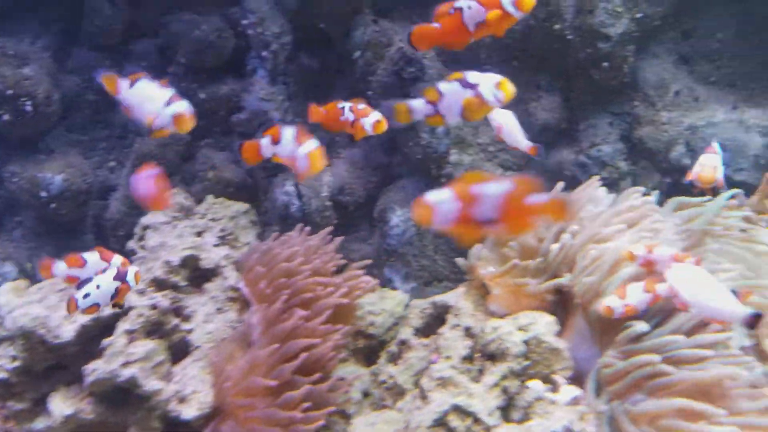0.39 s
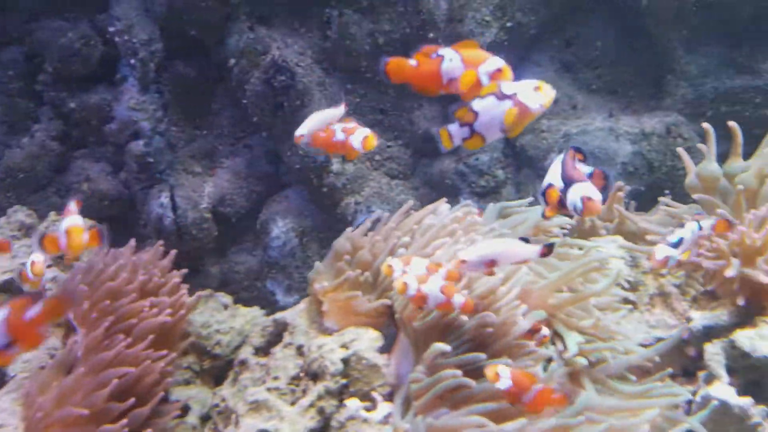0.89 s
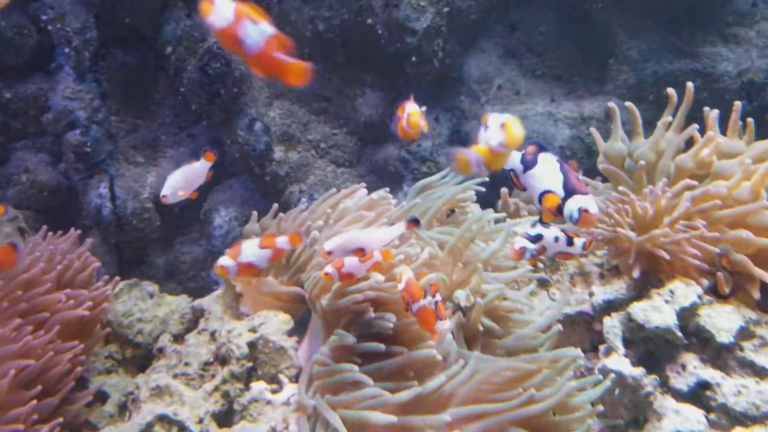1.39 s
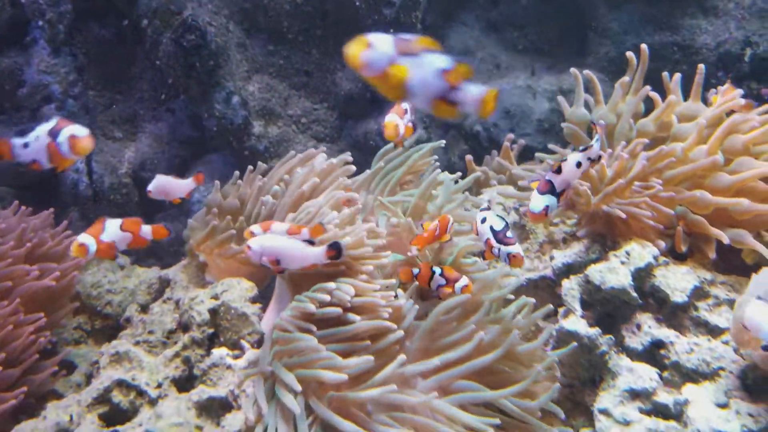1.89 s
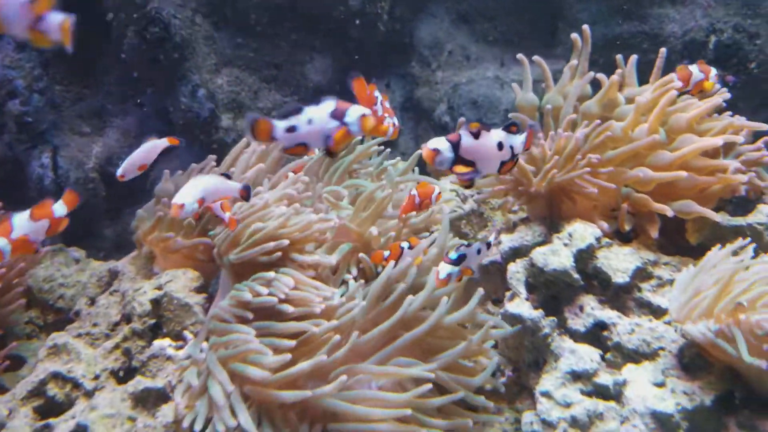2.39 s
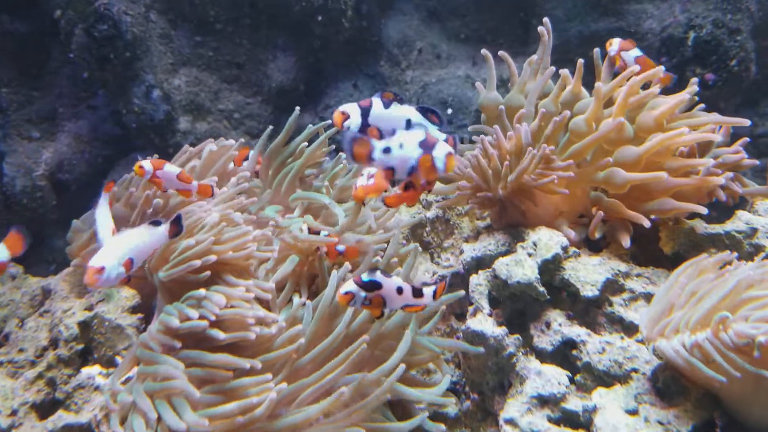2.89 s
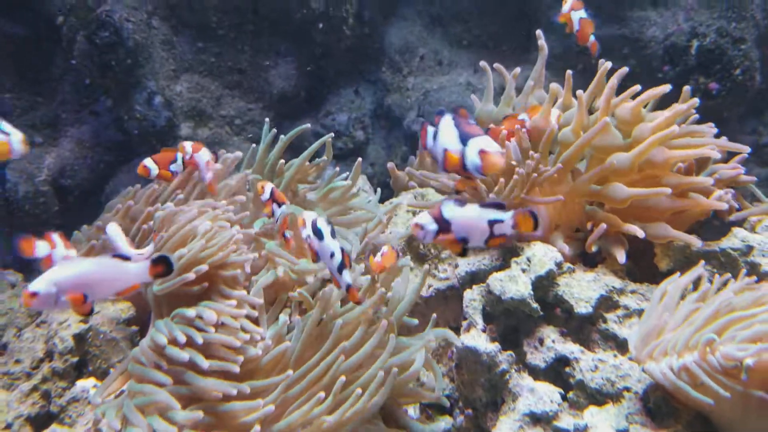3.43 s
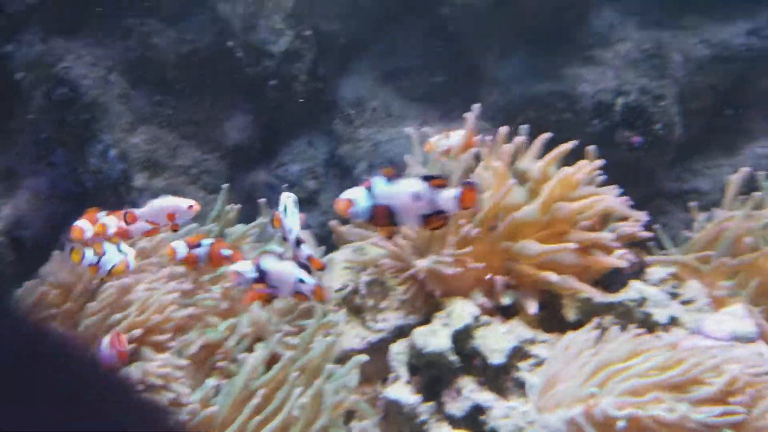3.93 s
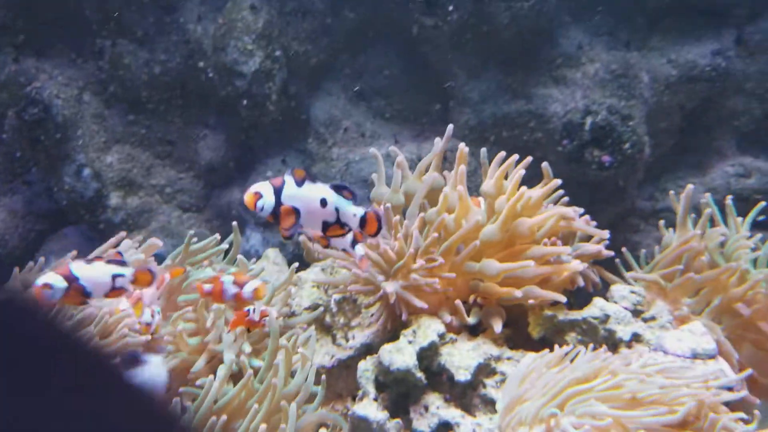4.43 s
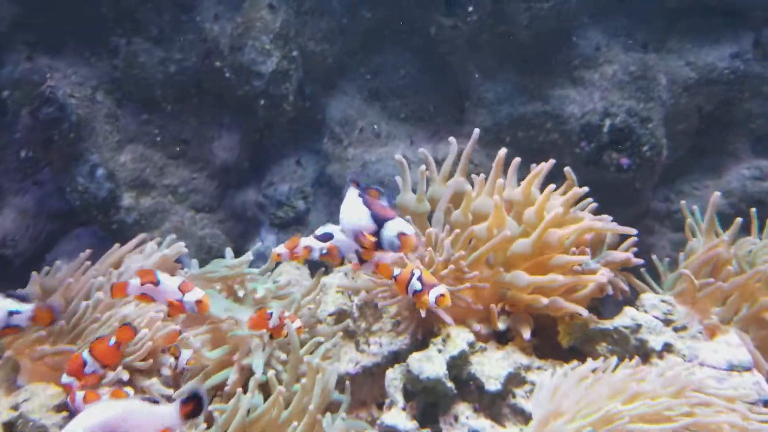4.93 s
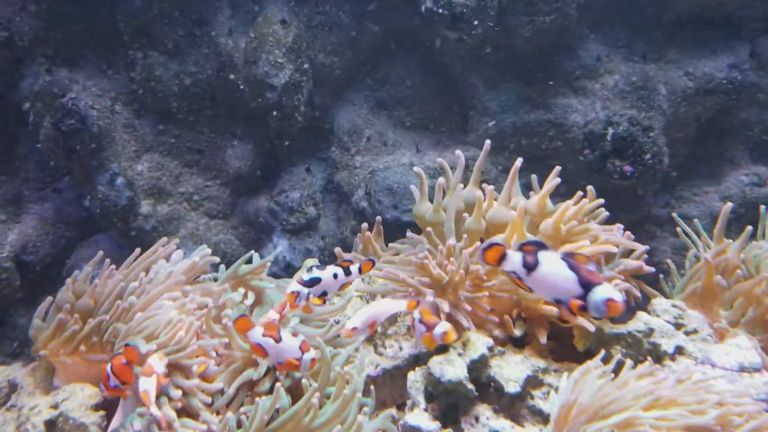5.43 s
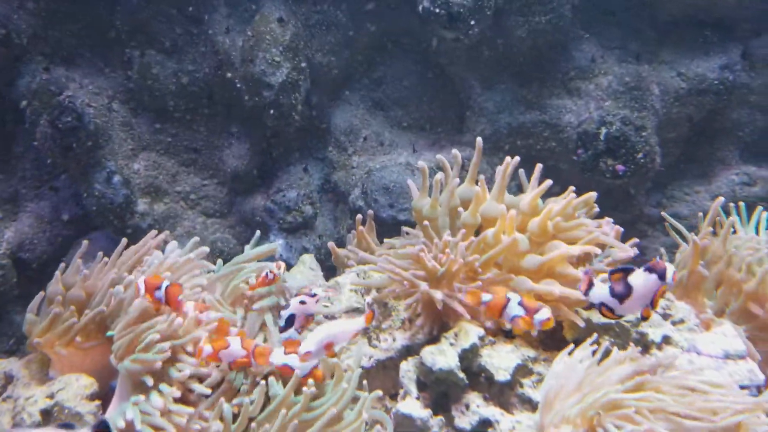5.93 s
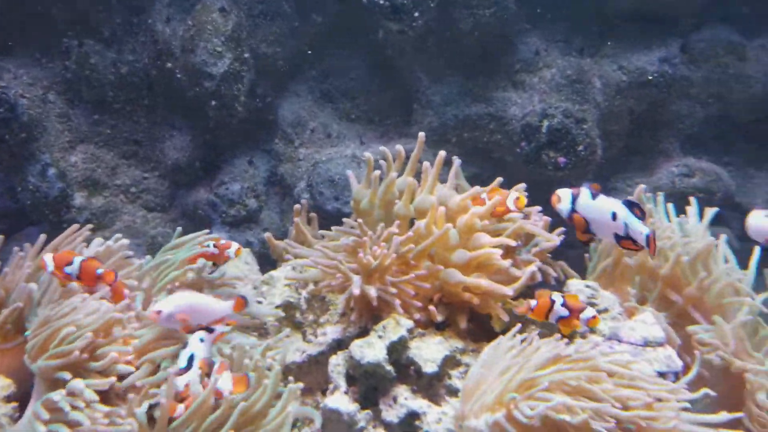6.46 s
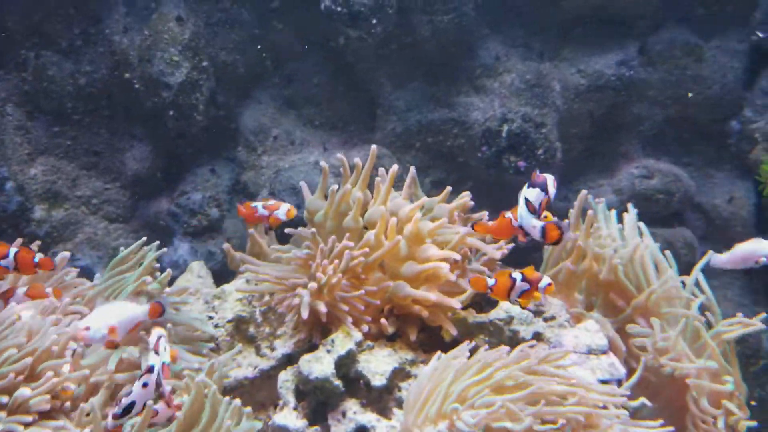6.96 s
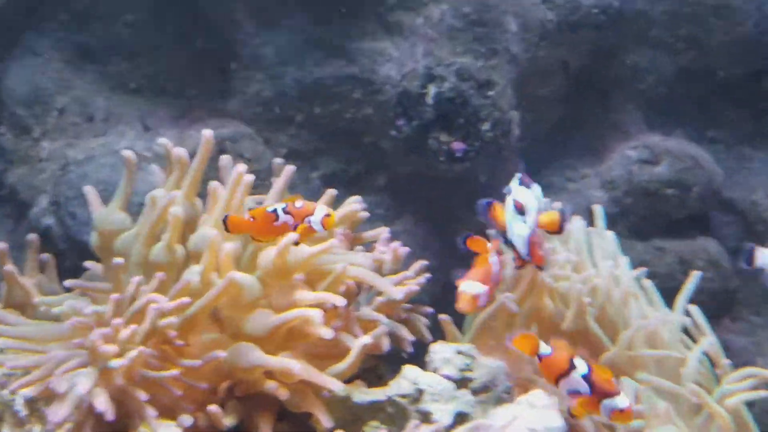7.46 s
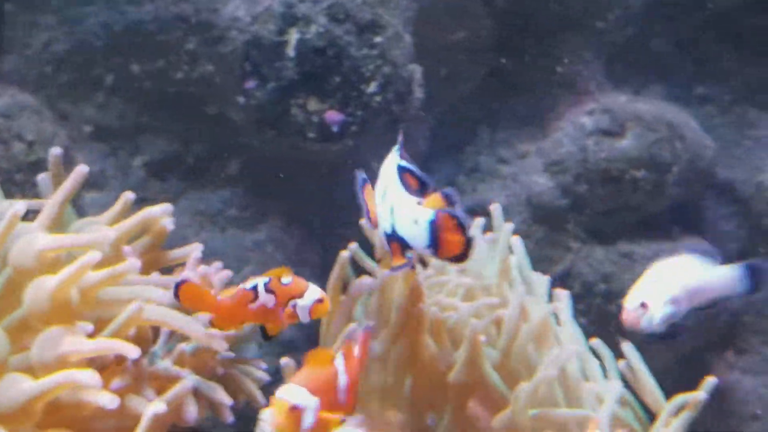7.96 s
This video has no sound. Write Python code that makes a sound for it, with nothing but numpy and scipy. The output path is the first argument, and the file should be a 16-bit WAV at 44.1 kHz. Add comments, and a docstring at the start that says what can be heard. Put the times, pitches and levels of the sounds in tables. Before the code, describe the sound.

A constant muffled pump hum and dark rush surround a fish tank, heard through a hand-held stereo camera. First comes a distant double knock on wood with light rustling, then plain hum. Midway, very close dry snaps and rasping skin slips erupt, mostly on the left and loud enough to overload slightly. The ending returns to wavering low hum with only tiny ticks.

```python
"""Fish-tank pumps, handled camera

Pumps hum around a fish tank in a quiet room: motor tones, noisy resonances, a swelling drone and a rush of
shaped noise, heard through two microphone ports of a hand-held camera. A finger half covers the left port,
slides over it (slip noise) and clicks as the skin sticks and lets go (damped case modes). Wood is knocked in
the room at the start (modes with a reflection tail), amid a rustle of coloured noise; hiss lies below."""
import sys
import numpy as np
from scipy import signal
from scipy.fft import rfft, irfft, next_fast_len
from scipy.io import wavfile
from scipy.ndimage import uniform_filter1d

SR = 44100
rng = np.random.default_rng(int(sys.argv[2]) if len(sys.argv) > 2 else 0)


def gain_from_db(level_db):
    """Turn a decibel level (scalar or array-like) into a linear amplitude factor."""
    decades = np.asarray(level_db, float) / 20
    return 10 ** decades


def wav_record(signal):
    """Record a signal, one row per channel, as 16-bit PCM in the file named by sys.argv[1]."""
    frames = np.transpose(np.atleast_2d(signal))
    bounded = np.clip(frames, -1, 1)
    # unit amplitude maps onto the largest positive 16-bit level
    quanta = np.round(bounded * 32767).astype(np.int16)
    wavfile.write(sys.argv[1], SR, quanta)


N = 356769

# the hand shifts on the camera: t/s, hum and rush level/dB, lean to the left/dB,
# hollow under the finger: top edge f/Hz, lift/dB
HOLD = [(0, 1.6, .5, 2550, 20.6), (.6, -0.33, 1.3, 2530, 19.3), (3.4, 0.79, 3.3, 2590, 17.1),
        (4.2, -0.6, 3.8, 2646, 16), (6, -.5, 4.3, 2750, 15), (8.09, -2.4, 2.25, 2890, 16.2)]
# share of a left-minus-right dB difference given to each port
LEFT_RIGHT = np.array([[.5], [-.5]])


def read(points, hz):
    """Interpolates a spectrum table on a log-frequency axis."""
    f, value = np.transpose(points)
    return np.interp(np.log(hz + 1), np.log(f + 1), value)


def follow(rows, t):
    """The columns of a curve table at times t."""
    s, *columns = np.transpose(rows)
    return [np.interp(t, s, c) for c in columns]


def evened(x):
    """Scales to rms 1."""
    return x / np.sqrt(np.mean(x ** 2) + 1e-20)


def coloured(x, points):
    """Filters by a spectrum in dB."""
    size = next_fast_len(x.shape[-1] + 2048)
    gain = gain_from_db(read(points, np.fft.rfftfreq(size, 1 / SR)))
    return irfft(rfft(x, size) * gain, size)[..., :x.shape[-1]]


def wander(rate_hz):
    """Slow random curve of rms 1: straight lines between knots, two per period."""
    t = np.arange(N) / SR
    knots = np.arange(0, t[-1] + 1, 0.5 / rate_hz)
    return evened(np.interp(t, knots, rng.standard_normal(len(knots))))


def add(mix, s, sound):
    """Mixes a sound in at time s."""
    part = mix[..., max(round(s * SR), 0):][..., :sound.shape[-1]]
    part += sound[..., :part.shape[-1]]


def whistle(hz, width_hz, same):
    """Noise in one resonance at both ports: a slow random amplitude and phase on a carrier."""
    step = 16  # samples per slow value
    a, b = rng.standard_normal((2, N // step + 1)) + 1j * rng.standard_normal((2, N // step + 1))
    same = np.clip(same, -1, 1)
    r = np.exp(-np.pi * width_hz * step / SR)
    both = [a, same * a + np.sqrt(1 - same ** 2) * b]
    slow = signal.lfilter([1], [1, -2 * r, r * r], both)
    slow = uniform_filter1d(np.repeat(slow, step, axis=1)[:, :N], size=step)
    carrier = np.exp(2j * np.pi * hz * np.arange(N) / SR)
    return evened((slow * carrier).real)


def motors():
    """Pump-motor mains tones, a little unsteady in level, and resonances of cabinet and pipes in the flow."""
    # mains hum: f/Hz, level/dB rms before wander and HOLD, left minus right/dB
    hum = [(120.4, -49, -2), (244, -64.5, -2), (356.7, -72.5, 1.5)]
    # resonances: f/Hz, pole width/Hz, level/dB rms before wander and HOLD, left minus right/dB, port likeness
    cabinet = [(393, 10, -74, 9, -0.28), (776, 230, -73.5, -1, .4), (865, 19, -74, 6.5, -0.31),
               (1040, 10, -86, -14, 0.13), (1100, 12, -79, -1.5, 0.42), (1379, 69, -63.5, 5, -0.9),
               (5080, 570, -92.5, 9.5, -0.39)]
    t = np.arange(N) / SR
    out = np.zeros((2, N))
    for hz, db, pan_db in hum:
        level = gain_from_db(db + pan_db * LEFT_RIGHT + 0.22 * wander(3.6))
        turns = hz * t + rng.random() + 0.035 * LEFT_RIGHT
        out += level * np.sqrt(2) * np.sin(2 * np.pi * turns)
    for hz, width_hz, db, pan_db, same in cabinet:
        out += gain_from_db(db + pan_db * LEFT_RIGHT + 1.8 * wander(1.5)) * whistle(hz, width_hz, same)
    return out


def drone():
    """One low tone, its pitch drifting a few hertz, swelling in bell shapes out of a faint rest level."""
    # swells: t of the top/s, level/dB rms added to rest, full width at 1/e/s
    swells = [(0.0, -55, 0.35), (0.474, -54, 0.12), (0.804, -53, 0.23), (1.098, -51.5, 0.25),
              (1.3, -48.5, 0.1), (1.802, -53, .45), (2.68, -50, 0.39), (3.144, -55, 0.76),
              (3.67, -55.5, .1), (4.132, -52.5, 0.29), (4.655, -46, 0.32), (4.955, -58.5, 0.12),
              (5.293, -57.5, 0.24), (5.767, -56, .25), (6.13, -58, 0.23), (6.47, -50.5, 0.1),
              (6.745, -46.5, 0.14), (6.99, -47, 0.16), (7.5, -56.5, 0.31), (8.052, -56, 0.36)]
    rest_db, centre_hz, drift_rms_hz = -69.5, 163.4, 3
    t = np.arange(N) / SR
    turns = np.cumsum(centre_hz + drift_rms_hz * wander(3.5)) / SR
    level = gain_from_db(rest_db) + sum(gain_from_db(db) * np.exp(-(2 * (t - s) / length) ** 2) for s, db, length in swells)
    return level * np.sqrt(2) * np.sin(2 * np.pi * turns)


def rush():
    """Pumps and water: random short-time spectra with drifting patches; the hollow lifts the left port."""
    # relative spectrum: f/Hz, density/dB
    spectrum = [(20, -37), (45, -11.5), (100, -4.5), (200, 1.5), (330, -9.5), (490, -15.5), (560, -25.5),
                (680, -21.5), (800, -19.5), (960, -23), (1500, -35), (2800, -36), (3300, -56.5),
                (6000, -54)]
    # f/Hz, left-right likeness
    likeness = [(60, 0.86), (130, 1), (290, 0.85), (640, 0.54), (1400, 0.079), (3000, .1)]
    frames, hz = N // 512 + 5, np.fft.rfftfreq(2048, 1 / SR)[:, None]
    a, b, c, d, patches = rng.standard_normal((frames, 1025, 5)).T
    patches = evened(uniform_filter1d(uniform_filter1d(patches, 15, 0), 10, 1))
    same = np.clip(read(likeness, hz), -1, 1)
    left = a + 1j * b
    right = same * left + np.sqrt(1 - same ** 2) * (c + 1j * d)
    z = np.array([left, right]) * gain_from_db(read(spectrum, hz) + 1.4 * patches)
    treble = 1 / (1 + (1500 / (hz + 1)) ** 5)
    # the right port's treble comes and goes
    flicker = evened(uniform_filter1d(patches[60:120].mean(0), 15))
    z[1] *= gain_from_db(4.7 * flicker * treble)
    *_, edge_hz, lift_db = follow(HOLD, np.arange(frames) * 512 / SR)
    z[0] *= gain_from_db(lift_db * treble / (1 + (hz / edge_hz) ** 24))
    noise = signal.istft(z, nperseg=2048, noverlap=1536)[1][:, :N]
    return gain_from_db(-50.5) * evened(noise)


def stroke(start, length, gentle):
    """Sample places, progress 0-1 and gain of one movement: a soft start, then a dying release."""
    edge_s, decay_s = 0.0096 * gentle, 0.0075 * gentle
    first = max(round((start - edge_s / 2) * SR), 0)
    at = np.arange(first, round((start + length + 14 * decay_s) * SR))
    rise = np.sin(np.pi / 2 * np.minimum((at - at[0]) / (edge_s * SR), 1))
    release = np.exp(-np.maximum(at / SR - start - length + edge_s / 2, 0) / decay_s)
    return at, np.clip((at / SR - start) / length, 0, 1), rise * release


def slides():
    """Dense tiny slips of skin on the left port: rumble, rasp, scratch, fizz; some leaks through the case."""
    # finger strokes: start/s, length/s, pressure at start/dB, at end/dB, speed as brightness/dB
    strokes = [(3.346, 0.057, -77, -57.5, 3.5), (3.396, 0.048, -51.5, -56.5, 2),
               (3.443, 0.036, -47, -42, -4), (3.468, .085, -31.5, -29, 0.5), (3.558, 0.045, -31, -43, 3.5),
               (3.611, 0.038, -46.5, -52, -3), (3.656, 0.066, -66, -78, -8), (3.886, 0.056, -66.5, -72, -1),
               (4.513, .035, -55, -56.5, 0.5), (4.558, 0.041, -49.5, -36, 11.5),
               (4.603, 0.079, -42, -50, -9.5), (4.679, 0.086, -44, -38, -6.5),
               (4.84, 0.06, -66, -68.5, -16), (5.177, 0.079, -71, -73, -11),
               (5.299, 0.038, -50.5, -38.5, 9), (5.329, .057, -42.5, -48, 6.5),
               (5.389, .036, -42, -47, 2.5), (5.421, 0.079, -46, -60.5, 2.5), (5.57, 0.057, -69, -68, -14),
               (5.828, 0.031, -71, -76.5, -22), (5.89, 0.048, -68.5, -76.5, -23.5)]
    # layer responses (rumble, rasp, scratch, fizz):
    # level at firm pressure/dB before the port doubling, dB per dB of pressure, dB per dB of speed
    answers = [(-37, 0.97, -0.64), (-34.5, 1.08, 0.03), (-38.5, 0.9, 0.44), (-50.5, 1.05, 0.79)]
    # relative layer spectra: f/Hz, density/dB
    rumble = [(60, -18), (200, -8.5), (450, 1.5), (650, 1), (900, -2.5), (1400, -31), (3000, -52.5)]
    rasp = [(400, -26.5), (800, -4.5), (1100, -1.5), (1500, -6), (1900, -3), (2400, -10), (3500, -45.5)]
    scratch = [(1200, -25), (2200, -1.5), (3300, -0.5), (4200, -3), (5200, -6.5), (7000, -26), (9000, -41)]
    fizz = [(3500, -21.5), (6000, 1.5), (7600, -0.5), (8800, -12.5), (11500, -8), (14000, -14),
            (15500, -39.5)]
    # path through the case to the right port: f/Hz, gain/dB before grip
    path = [(60, -16), (200, -23), (700, -20), (1300, -26.5), (2500, -43.5), (4400, -50.5), (15000, -44)]
    # how firmly the case carries sound to the right port: t/s, gain/dB
    grip = [(3.7, 5.5), (4.4, -18.5), (5.6, -19)]
    firm_db, light_db, edge_per_db, slowing_db = -35.5, -57.5, 0.5, 7

    slips = rng.standard_normal((4, N)) * gain_from_db(3.8 * np.minimum(rng.exponential(1, N), 4))
    clumps = gain_from_db(1.2 * wander(150) + 1.5 * np.array([wander(40) for _ in slips]))
    colours = (rumble, rasp, scratch, fizz)
    layers = np.array([evened(coloured(s, colour)) for s, colour in zip(slips, colours)])
    level_db, per_pressure, per_speed = np.transpose(answers)[..., None]
    power = np.zeros((4, N))
    for start, length, first_db, last_db, speed_db in strokes:
        # light strokes have longer edges
        gentle = 1 + edge_per_db * max(light_db - max(first_db, last_db), 0)
        at, done, edges = stroke(start, length, gentle)
        pressure_db = first_db + (last_db - first_db) * done - firm_db
        pace_db = speed_db + slowing_db * (0.5 - done)  # brightness falls along the stroke
        gain = gain_from_db(level_db + per_pressure * pressure_db + per_speed * pace_db)
        power[:, at] += (edges * gain) ** 2
    out = 2 * (clumps * np.sqrt(power) * layers).sum(0)  # doubled: all of it in one port
    # many paths through the case
    smear = rng.standard_normal(200) * np.exp(-np.arange(200) / 60)
    leak = coloured(signal.oaconvolve(out, smear / np.linalg.norm(smear))[:N], path)
    return np.array([out, leak * gain_from_db(follow(grip, np.arange(N) / SR)[0])])


def ring(modes, pitch, extra_db, soft_s):
    """Dying modes, neighbours in opposite phase, after a soft blow; low pitch rings longer; peak 1."""
    t = np.arange(SR // 5) / SR
    out = np.zeros(len(t))
    for k, (hz, db, t60) in enumerate(modes):
        decay = gain_from_db(db + extra_db[k] - 60 * t * pitch / t60)
        out += (-1) ** k * decay * np.sin(2 * np.pi * hz * pitch * t)
    # the high-pass leaves no net push
    out = signal.lfilter(*signal.butter(2, 200, "high", fs=SR), out * (1 - np.exp(-t / soft_s)))
    return out / abs(out).max()


def case(pitch, low_db, high_db):
    """Heavily damped case rung once: the finger detunes its lower modes, the top two (the port's) stay."""
    # modes at pitch factor 1: f/Hz, level/dB relative, t60/s
    table = [(667, 3.5, 0.0047), (1210, 4, 0.0048), (2100, 2, 0.0024), (2837, -1.5, 0.0034),
             (3800, -16, 0.003), (5740, -6.5, 0.00075), (7560, -13, 0.0013), (10330, -26, 0.0016),
             (12860, -30.5, 0.0016)]
    modes = [(hz * pitch, db, t60 / pitch) for hz, db, t60 in table[:7]] + table[7:]
    extra_db = [low_db, low_db / 2, 0, 0, 1.12 * high_db] + 4 * [high_db]
    out = ring(modes, 1, extra_db, 0.00015)
    # a flipped copy follows, sooner at low pitch
    echo_s, echo_share = 0.00108 * pitch, 0.4
    at = np.arange(len(out))
    out = out - echo_share * np.interp(at - echo_s * SR, at, out)
    return out / abs(out).max()


def clicks():
    """Each skin release or tap rings the case, mostly at the nearer port; a push is one soft low swing."""
    # skin lets go of the left port: t/s, left peak/dB, pitch factor, extra low modes/dB, extra high modes/dB
    releases = [(3.3448, -23, 0.74, -10, 2.5), (3.371, -35.5, 1.7, 5, 3.5), (3.395, -9.5, 0.9, -4, 6),
                (3.3987, -17, 0.99, -3, 21), (3.444, -23, 1.1, -17, -14), (3.468, -2.5, 0.84, -7, 2),
                (3.6132, -11, 0.653, 12, 24), (4.549, -22, 0.85, 11, 18), (4.6622, -1, 0.76, -3.5, 7),
                (4.8279, -17.5, 1.01, -0.5, 17.5), (4.9543, 0.5, 0.96, -8.5, -2),
                (5.4123, -7.5, 1.25, -18.5, 0.5), (5.647, -37.5, 0.63, 20, -18),
                (5.78, -37.5, 0.57, 24, -8.5), (6.979, -40, 0.7, 14, -9), (7.075, -48.5, 1.1, -11, 6)]
    # dull taps near the right port: t/s, right peak/dB, pitch factor
    taps = [(2.4643, -27.5, 0.92), (4.535, -37, 0.46), (4.9883, -30.5, 0.9)]
    # fingertip seals the left port and pushes air: t/s, level/dB before the window, f/Hz
    pushes = [(3.6, -38, 32.04), (4.71, -40, 40)]
    through_db, through_per_db = -40, 0.6  # right port: level for a full-scale release, growth per dB
    out = np.zeros((2, N))
    for s, db, *colour in releases:
        ports_db = np.array([[db], [through_db + through_per_db * db]])
        add(out, s, gain_from_db(ports_db) * case(*colour))
    for s, db, pitch in taps:
        add(out, s, gain_from_db(np.array([[db - 15], [db]])) * case(pitch, low_db=-3, high_db=-17.5))
    for s, db, hz in pushes:
        t = np.arange(-1 / hz, 1 / hz, 1 / SR)
        add(out[0], s + t[0], gain_from_db(db) * np.sin(2 * np.pi * hz * t) * np.hanning(len(t)))
    return out


def knocks():
    """Wood struck across the room, with a tail of sparse reflections dying band by band."""
    # blows: t/s, peak/dB before pan and tail, pitch factor
    blows = [(0.0956, -27.5, 0.96), (.206, -32, .32)]
    # modes at pitch factor 1: f/Hz, level/dB relative, t60/s
    wood = [(614, -1.5, 0.024), (1018, 5, 0.017), (1760, 3, 0.011), (2210, -1, 0.014), (2750, -6, 0.011),
            (4900, -9, 0.0045)]
    # reverberation: f/Hz, t60/s
    room = [(250, 1), (1000, 0.29), (3000, 0.6), (8000, 0.39)]
    direct = np.zeros(N)
    for s, db, pitch in blows:
        add(direct, s, gain_from_db(db) * ring(wood, pitch, np.zeros(len(wood)), 0.00015))
    # one reflection of random sign in every 20 samples
    reflections = np.zeros((2, SR))
    at = np.arange(200, SR - 20, 20) + rng.integers(0, 20, (2, (SR - 201) // 20))
    np.put_along_axis(reflections, at, rng.choice([-1., 1.], at.shape), 1)
    hz, t, z = signal.stft(reflections, SR, nperseg=256)
    tail = signal.istft(z * gain_from_db(-60 * t / read(room, hz)[:, None]), SR, nperseg=256)[1]
    wet = signal.fftconvolve(direct[None, :SR], tail / np.linalg.norm(tail[0]), axes=1)
    out = direct * gain_from_db(2.9 * LEFT_RIGHT)
    add(out, 0, gain_from_db(-0.5) * wet)
    return out


def rustle():
    """Soft coloured noise from the room, independent at the two ports, scaled by its treble."""
    # around the first knock, returning faintly: start/s, length/s, treble at start/dB, at end/dB (before pan)
    moves = [(.005, 0.087, -66, -82), (0.1, 0.082, -62.5, -69.5), (0.189, 0.21, -66, -82),
             (0.465, 0.25, -80.5, -79)]
    # relative spectrum: f/Hz, density/dB
    colour = [(300, 5), (1000, -2), (2000, 5), (3500, -10), (6000, -16), (7500, -34), (10000, -59)]
    out = np.zeros((2, N))
    noise = coloured(rng.standard_normal((2, SR)), colour)
    noise /= np.std(signal.lfilter(*signal.butter(4, 3200, "high", fs=SR), noise))
    for start, length, first_db, last_db in moves:
        at, done, edges = stroke(start, length, 2.5)
        level_db = first_db + (last_db - first_db) * done + 7.7 * LEFT_RIGHT
        out[:, at] += edges * gain_from_db(level_db) * noise[:, at]
    return out


def hiss():
    """Microphone self-noise: coloured Gaussian noise, independent at the two ports."""
    # relative spectrum: f/Hz, density/dB
    colour = [(1000, 8), (3000, 3), (8000, -2), (12000, -0.5), (16000, -3.5)]
    return gain_from_db(-76) * evened(coloured(rng.standard_normal((2, N)), colour))


def scene():
    """Tank and self-noise under a drawn level curve; drone, hand, knocks and rustle outside it."""
    # level curve of tank and hiss, sagging after loud clicks and creeping back: t/s, gain/dB
    sag = [(3.45, -0.5), (3.6, -1), (4.94, 0), (5, -3.5), (5.6, -6), (6, -5.5), (6.7, -0.5), (7.5, 1.7)]
    t = np.arange(N) / SR
    sag_db, = follow(sag, t)
    tank_db, lean_db, *_ = follow(HOLD, t)
    tank = (motors() + rush()) * gain_from_db(sag_db + tank_db + lean_db * LEFT_RIGHT)
    low_tone = gain_from_db((lean_db - 2.5) * LEFT_RIGHT) * drone()
    hand = slides() + clicks()
    return tank + low_tone + hand + knocks() + rustle() + gain_from_db(sag_db) * hiss()


def low_pass(x):
    """Removes everything above the highest recorded frequency."""
    return signal.sosfilt(signal.butter(12, 16660, fs=SR, output="sos"), x)


def record(dry):
    """The converter clips just under full scale."""
    clipped = np.clip(dry, -0.99, 0.99)
    return low_pass(clipped)


dry = scene()
out = record(dry)
wav_record(out)
```